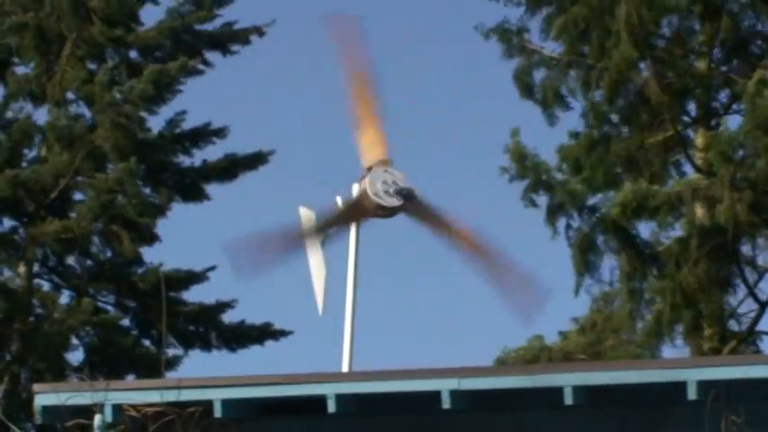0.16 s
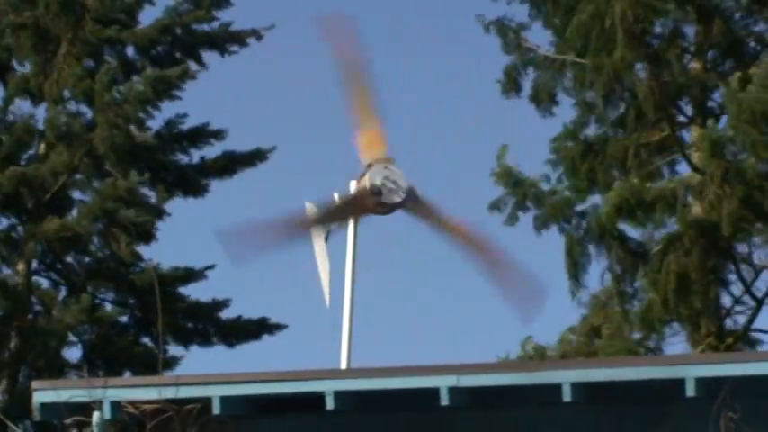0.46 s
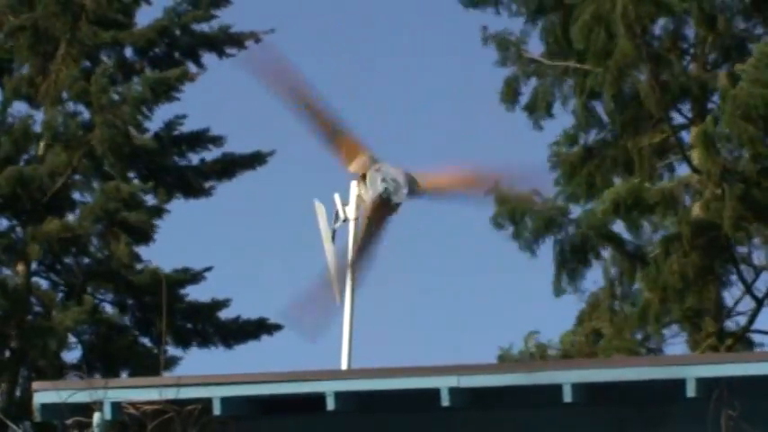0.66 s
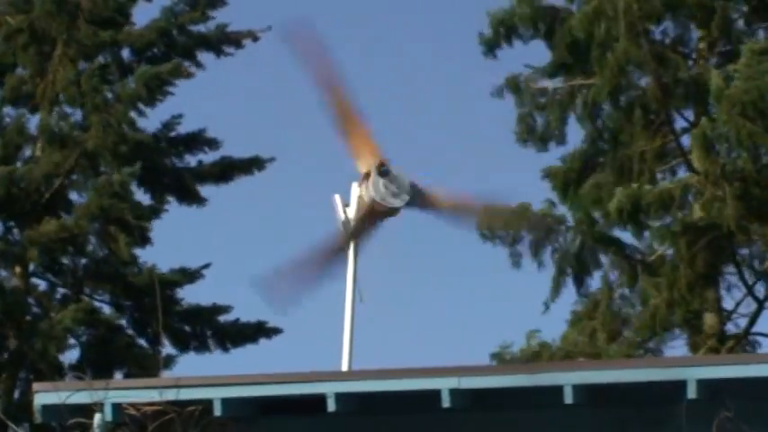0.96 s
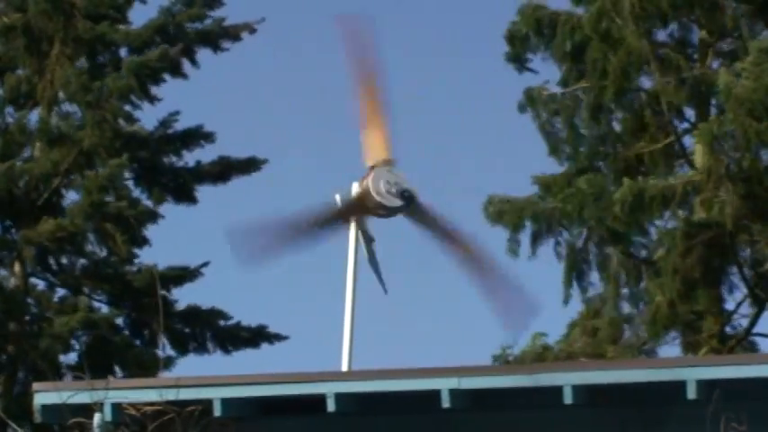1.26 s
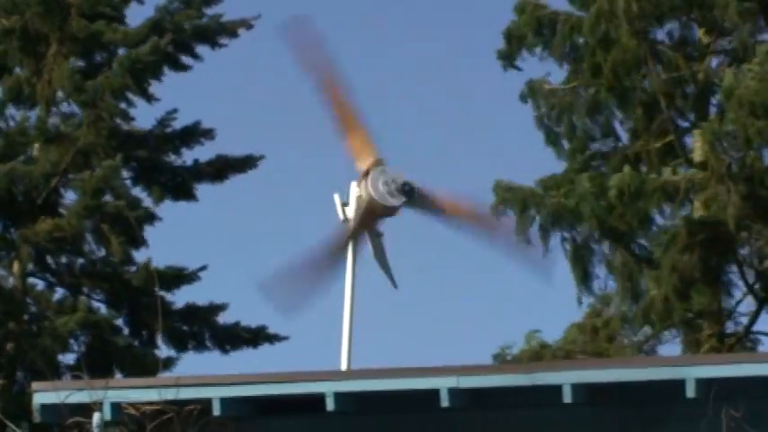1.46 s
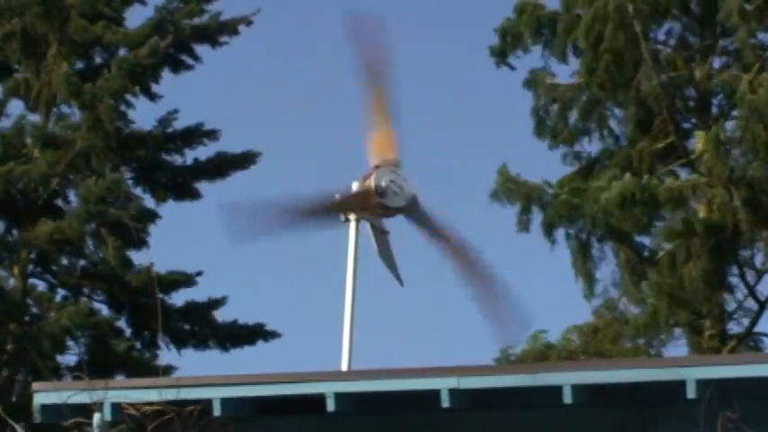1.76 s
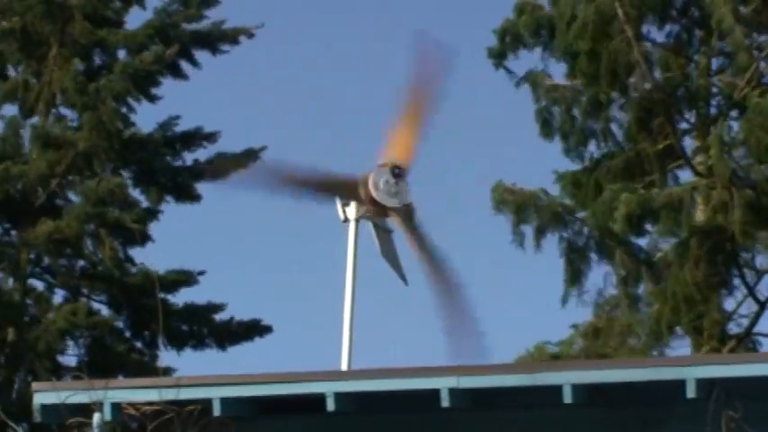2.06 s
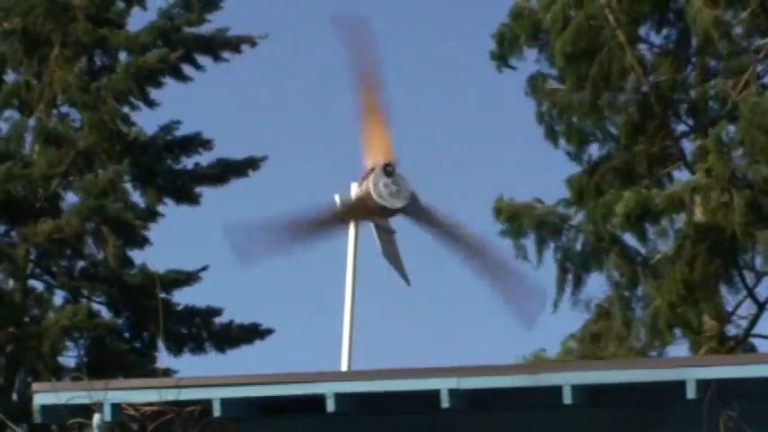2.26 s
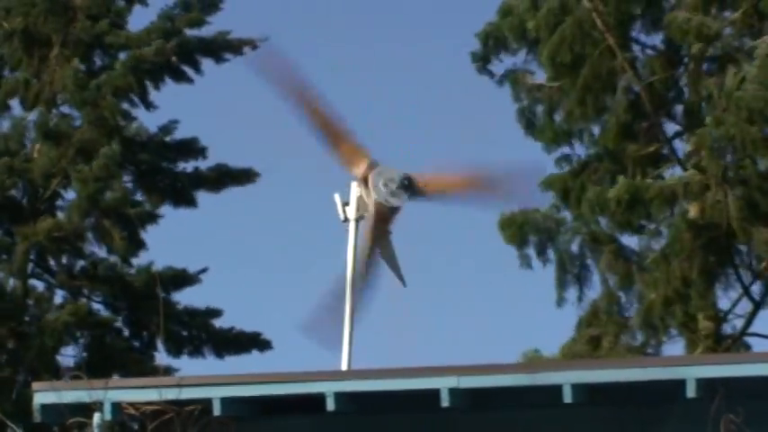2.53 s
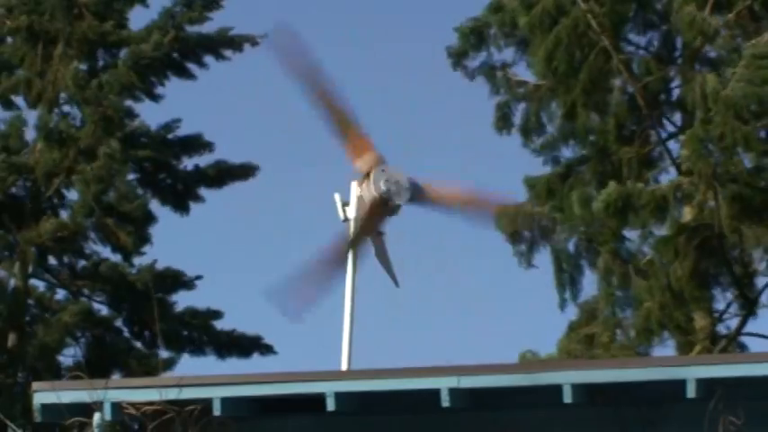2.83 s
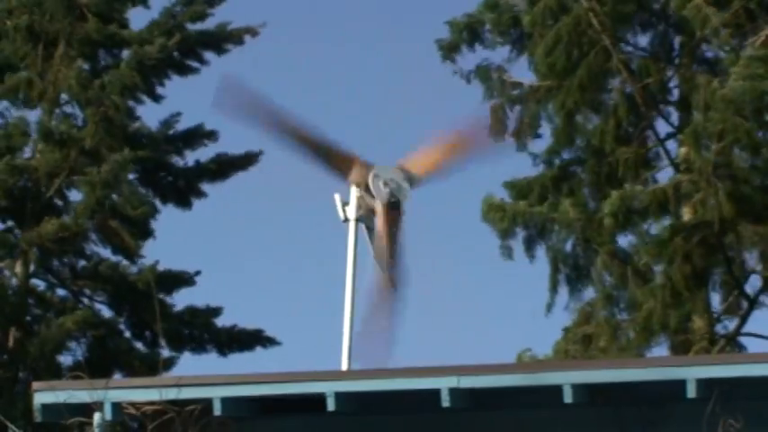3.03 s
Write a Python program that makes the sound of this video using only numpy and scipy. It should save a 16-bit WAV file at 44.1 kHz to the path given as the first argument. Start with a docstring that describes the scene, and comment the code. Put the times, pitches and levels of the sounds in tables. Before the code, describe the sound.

Strong wind buffets the microphone outdoors, with a deep rumble and irregular thumps throughout. The gust builds to a hollow roar, and at about 0.5 seconds the hardest blast overloads the microphone with one sharp crack. The roar continues until about 2 seconds, then gives way to choppy, fluttering thumps up to the end, just past 3 seconds. Air hisses faintly in the trees behind it.

```python
"""Strong wind on a microphone

Outdoors, a long gust roars over the two openings (ports) of a stereo microphone.
Swirls of air thump against them before, during and after it, on top of a deep rumble.
The hardest blast overloads the microphone with a crack.
Behind it all, air hisses in tall conifers; the hiss dips where blasts briefly dull the microphone."""
import sys
import numpy as np
from scipy import signal
from scipy.io import wavfile
from scipy.ndimage import uniform_filter1d

SR = 44100
rng = np.random.default_rng(int(sys.argv[2]) if len(sys.argv) > 2 else 0)


def int16_out(signal):
    """Quantize to a 16-bit WAV file."""
    q = np.round(np.clip(np.atleast_2d(signal).T, -1, 1) * 32767)
    wavfile.write(sys.argv[1], SR, q.astype(np.int16))


N = 140679
TIME = np.arange(N) / SR
STEP = 20  # samples between updates of the loudness curves
CONTROL_TIME = TIME[::STEP]
BAND_EDGES = 18 * 2 ** (np.arange(26) * .4)  # in Hz: the noise is built from 25 bands, low to high
CENTRES = np.sqrt(BAND_EDGES[1:] * BAND_EDGES[:-1])
EVEN_S = 0.026  # random swells of the wind slower than this are mostly held back


def port_wind():
    """Churning air roars and rumbles at the ports, alike in the bass and separate above it."""
    # The unbroken flow of air. Each row: time in seconds, level in dB.
    flow_levels = [(0, -39.5), (.29, -33.5), (.51, -29), (.54, -50), (.6, -33.5), (.8, -27.5), (1.03, -26),
                   (1.18, -31), (1.42, -27.5), (1.99, -29), (2.06, -41), (2.3, -42), (2.88, -44),
                   (3.19, -60)]
    # Its tone. Each row: frequency in Hz, relative strength in dB.
    flow_tone = [(25, -25), (60, -7.5), (110, 0), (195, 2), (350, -2.5), (500, -7), (1100, -19),
                 (4000, -41.5), (16000, -76)]
    # The deep pressure rumble. Each row: time in seconds, level in dB.
    rumble_levels = [(0, -29), (.55, -36), (1.45, -34), (2.1, -37), (2.85, -38.5), (2.97, -47), (3.19, -43)]
    # Its tone. Each row: frequency in Hz, relative strength in dB.
    rumble_tone = [(20, -19), (48, 0.5), (85, -4), (2000, -79)]
    # How alike the ports sound. Each row: frequency in Hz, likeness (1 is the same, 0 unrelated).
    likeness = [(110, 0.96), (200, 0.025), (450, -0.17), (2000, 0.099)]
    # Which port is louder. Each row: frequency in Hz, left minus right in dB.
    balance = [(30, -2), (160, 2.5), (350, -0.5), (700, -1)]
    power = band_power(flow_tone, level(flow_levels)) + rush() + buffets()
    lump_db, patch_db = 2.5, 1.5  # lumps shake all bands at once, patches sway each on its own
    lumps = from_db(lump_db * drift(rate_hz=107)) ** 2
    lumps /= uniform_filter1d(lumps, int(EVEN_S * SR / STEP))
    patches = np.array([rms_one(from_db(patch_db * drift(rate_hz=13.4))) for _ in CENTRES]) ** 2
    rumble = band_power(rumble_tone, level(rumble_levels))
    return stereo_noise(power * lumps * patches + rumble, likeness, balance, evenness=0.84)


def rush():
    """Band powers of the hollow rush of the fastest air; its pitch sinks as the air slows."""
    # The strength of the rush. Each row: time in seconds, level in dB.
    levels = [(.33, -47), (.41, -30.5), (.52, -30.5), (.54, -34), (.73, -30), (.84, -31.5), (.96, -40),
              (1.04, -33), (1.3, -37.5), (1.88, -41.5), (2.01, -29), (2.06, -40)]
    # Its tone at full speed. Each row: frequency in Hz, relative strength in dB.
    tone = [(25, -27), (270, -14), (500, 0.5), (760, 2), (1050, -8.5), (1500, -15.5), (2100, -29),
            (6000, -39.5), (16000, -70)]
    octaves_per_db = 0.1122
    gain = level(levels)
    shift_octaves = octaves_per_db * 20 * np.log10(gain / gain.max())
    hz, db = np.transpose(tone)
    shifted_db = np.interp(np.log2(CENTRES)[:, None] - shift_octaves, np.log2(hz), db)
    share = from_db(shifted_db) ** 2 * np.diff(BAND_EDGES)[:, None]
    return share / share.sum(axis=0) * gain ** 2


def buffets():
    """Band powers of swirls hitting the ports, each a low thump, a body and a higher flutter."""
    # The swirls. Each row: middle and length in seconds, then thump, body and flutter levels in dB.
    swirls = [ (0.016, 0.026, -27, -24.5, -32), (0.068, 0.052, -34, -27.5, -31),
              (0.206, 0.045, -31, -21, -32.5), (0.238, 0.02, -42, -25.5, -34.5),
              (.324, 0.025, -20, -20.5, -39), (0.355, 0.029, -26, -27, -35.5),
              (0.456, 0.025, -21, -21, -30), (0.497, 0.025, -30.5, -36, -28),
              (0.699, 0.047, -34, -45, -26.5), (0.966, 0.028, -27, -38, -56),
              (1.257, 0.019, -42, -23.5, -35), (1.305, 0.023, -48, -27.5, -50),
              (1.413, 0.033, -32, -26, -52), (1.49, 0.038, -37, -26, -39), (1.767, 0.055, -33, -27, -49),
              (1.837, 0.058, -44, -27, -53), (1.954, 0.057, -32.5, -27, -52),
              (2.033, 0.018, -24.5, -25.5, -32), (2.081, 0.025, -35, -28, -31.5),
              (2.147, 0.038, -29, -24, -36.5), (2.221, 0.034, -26.5, -28.5, -42),
              (2.269, 0.018, -34, -29, -49), (2.334, 0.013, -35, -26, -34), (2.366, 0.0076, -25, -24, -45),
              (2.392, .018, -30, -27, -45), (2.427, 0.041, -32, -27.5, -32.5),
              (2.509, 0.034, -33, -32, -41), (2.555, 0.025, -29.5, -24.5, -32),
              (2.588, 0.026, -31, -29.5, -46.5), (2.647, 0.031, -32, -37, -63),
              (2.693, 0.02, -23, -24, -36), (2.718, 0.022, -30, -23, -31.5),
              (2.782, 0.034, -30, -23.5, -39.5), (2.809, 0.014, -27, -26, -35.5),
              (2.857, 0.042, -39, -29, -50), (2.915, 0.043, -32.5, -24.5, -39.5),
              (3.075, 0.025, -22.5, -24, -32.5), (3.133, 0.015, -37, -33, -54)]
    # The tones of the three parts. Each row: frequency in Hz, relative strength in dB.
    thump = [(20, -4.5), (45, 2), (85, 2.5), (130, -6), (2000, -84)]
    body = [(40, -13), (125, 0), (200, -1.5), (370, -5.5), (600, -17), (5000, -93)]
    flutter = [(150, -5), (520, 3.5), (800, -2), (1200, -14), (5000, -41), (16000, -74)]
    middle, length, *part_levels = np.transpose(swirls)
    steepness = 3.8
    swells = np.exp(-np.abs(2 * (CONTROL_TIME - middle[:, None]) / length[:, None]) ** steepness)
    return sum(band_power(tone, np.sqrt(from_db(db) ** 2 @ swells))
               for tone, db in zip((thump, body, flutter), part_levels))


def overload_choke(air):
    """The hardest blast pins the microphone at one pressure for a moment."""
    middle_s, length_s = .4861, .0055
    blocked = np.exp(-(2 * (TIME - middle_s) / length_s) ** 8)
    held = air[:, [int((middle_s - length_s / 2) * SR)]]
    return air * (1 - blocked) + held * blocked


def overload_crack():
    """The overloaded microphone cracks with three sharp pressure snaps."""
    # The snaps. Each row: start in seconds, height (plus or minus), right port's delay in seconds.
    snaps = [(0.5164, 0.26, 0.0009), (0.5185, -0.51, 0), (0.5196, -0.21, 0.0005)]
    rise_s, low_cut_hz = .000075, 140
    pulses = np.zeros((2, N))
    for start, height, delay in snaps:
        age = np.clip((TIME - start - np.array([[0], [delay]])) / rise_s, 0, 20)
        pulses += height * age * np.exp(1 - age)
    low_cut = signal.butter(1, low_cut_hz, "high", fs=SR, output="sos")  # gives each a small rebound
    return signal.sosfilt(low_cut, pulses)


def tree_hiss():
    """Air hisses in the trees; blasts dull the microphone, so the hiss drops fast and returns slowly."""
    # The strength of the hiss. Each row: time in seconds, level in dB.
    levels = [(.3, -45), (.39, -48.5), (.45, -45), (.487, -42), (.506, -25.5), (.515, -40), (.54, -47),
              (.74, -52), (.83, -44), (.95, -48.5), (1.9, -47.5), (2.0, -45), (2.08, -48.5)]
    # Its tone. Each row: frequency in Hz, relative strength in dB.
    tone = [(20, -20), (300, 1.5), (2400, -1), (6600, -11.5), (8300, -18), (10000, -30), (12000, -26),
            (14000, -35), (16000, -68)]
    # How alike the two sides sound. Each row: frequency in Hz, likeness (1 is the same).
    likeness = [(1400, 1), (3000, 0.94)]
    # Which side is louder. Each row: frequency in Hz, left minus right in dB.
    balance = [(500, -6), (2800, -2.5), (13000, 0.5)]
    # Moments when overload dulls the microphone. Each row: time and hold in seconds, depth in dB.
    dips = [(0.199, 0.03, 4.5), (0.333, 0.073, 5.5), (0.465, 0.027, 15), (0.53, .015, 13), (0.614, 0.02, 8),
            (0.912, 0.052, 8.5), (2.342, .025, 9.5), (2.428, 0.011, 7.5), (2.787, 0.028, 7),
            (2.918, 0.071, 10.5)]
    fall_s, recover_s = 0.01, 0.055
    dip_db = np.max([
        np.interp(CONTROL_TIME, [at - fall_s, at, at + hold, at + hold + recover_s], [0, db, db, 0])
        for at, hold, db in dips], axis=0)
    flicker_db = .5 * drift(rate_hz=40.3)
    gain = level(levels) * from_db(flicker_db - dip_db)
    return stereo_noise(band_power(tone, gain), likeness, balance, evenness=0)


def stereo_noise(power, likeness, balance, evenness):
    """Stereo noise that follows each band's power; evenness (0 to 1) holds random swells back."""
    noise, run_in = np.zeros((2, N)), SR // 2
    white = rng.standard_normal((2, 2, N + run_in))
    alike, pan_db = np.clip(per_band(likeness), -.99, .99), per_band(balance)
    for k in range(len(CENTRES)):
        band_pass = signal.butter(3, BAND_EDGES[k:k + 2], "band", fs=SR, output="sos")
        mid, side = signal.sosfilt(band_pass, white[k % 2])[:, run_in:]
        band = np.sqrt(1 + alike[k]) * mid + np.sqrt(1 - alike[k]) * np.array([side, -side])
        if evenness:
            recent_power = uniform_filter1d(np.mean(band ** 2, axis=0), int(EVEN_S * SR))
            band /= (recent_power + 1e-18) ** (evenness / 2)
        pan = rms_one(from_db([[pan_db[k] / 2], [-pan_db[k] / 2]]))
        noise += rms_one(band) * pan * np.interp(TIME, CONTROL_TIME, np.sqrt(power[k]))
    return noise


def band_power(tone, gain):
    """Share a layer's power among the bands at each moment, according to its tone."""
    share = from_db(per_band(tone)) ** 2 * np.diff(BAND_EDGES)
    return np.outer(share / share.sum(), gain ** 2)


def per_band(rows):
    """Read a table of frequencies and values at the centre of each band."""
    hz, value = np.transpose(rows)
    return np.interp(np.log(CENTRES), np.log(hz), value)


def level(rows):
    """Join rows of seconds and dB into a gain curve."""
    return from_db(np.interp(CONTROL_TIME, *np.transpose(rows)))


def drift(rate_hz):
    """A smooth random wobble with a typical size of 1."""
    memory = np.exp(-2 * np.pi * rate_hz * STEP / SR)
    count = len(CONTROL_TIME)
    wobble = signal.lfilter([1], [1, -2 * memory, memory ** 2], rng.standard_normal(2 * count))
    return rms_one(wobble[count:])


def from_db(db):
    """Turn decibels into a gain to multiply by."""
    return 10 ** (np.asarray(db) / 20)


def rms_one(x):
    """Scale a signal to an average power of 1."""
    return x / np.sqrt(np.mean(x ** 2) + 1e-20)


def scene():
    """Wind and hiss reach the microphone, which chokes once and then cracks."""
    return overload_choke(port_wind() + tree_hiss()) + overload_crack()


def record(dry):
    """Round off the tallest peaks slightly and cut the highest treble."""
    ceiling, cutoff_hz = .7, 17500
    rounded = ceiling * np.tanh(dry / ceiling)
    return signal.sosfilt(signal.cheby2(12, 70, cutoff_hz, fs=SR, output="sos"), rounded)


dry = scene()
out = record(dry)
int16_out(out)
```